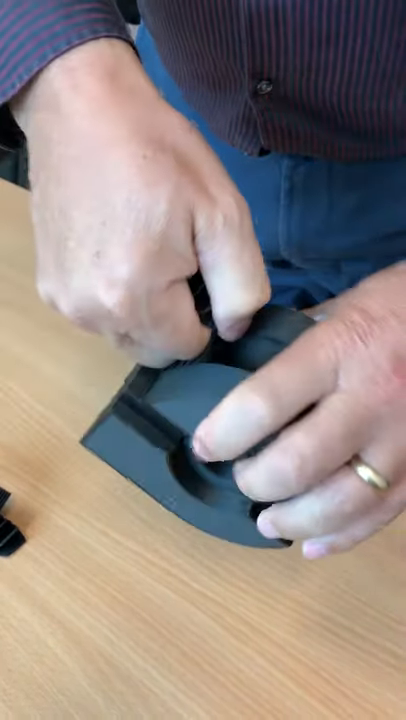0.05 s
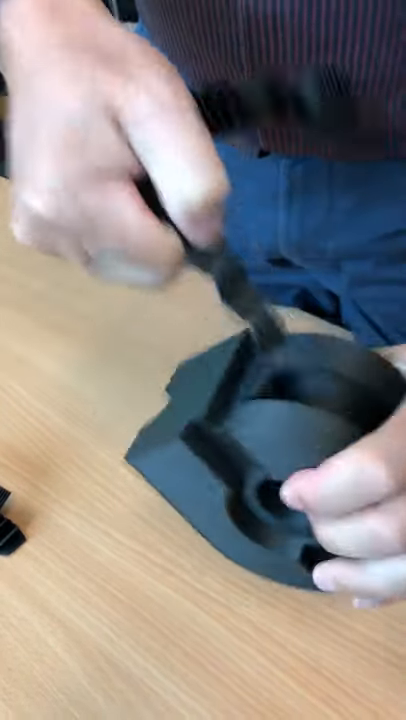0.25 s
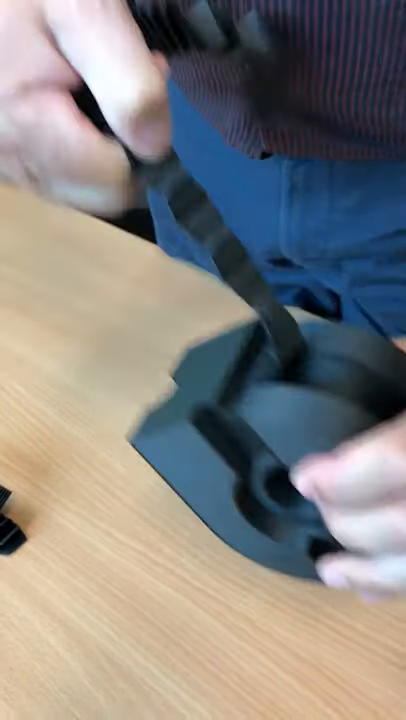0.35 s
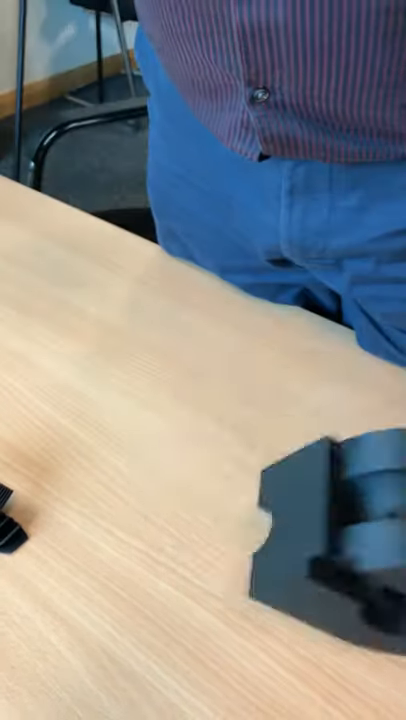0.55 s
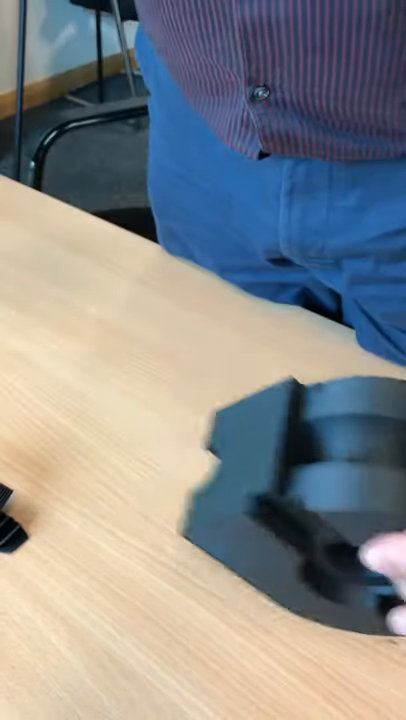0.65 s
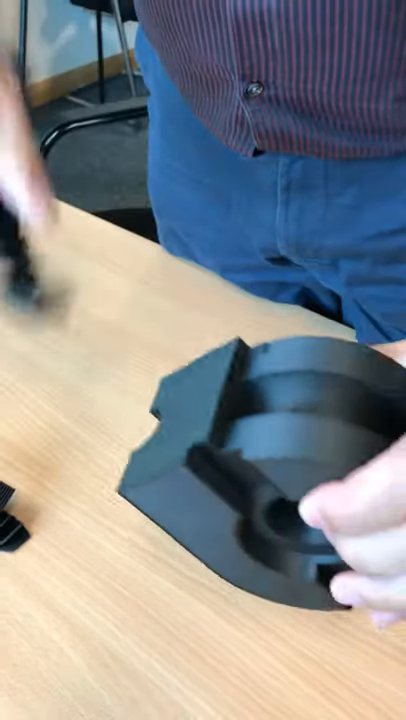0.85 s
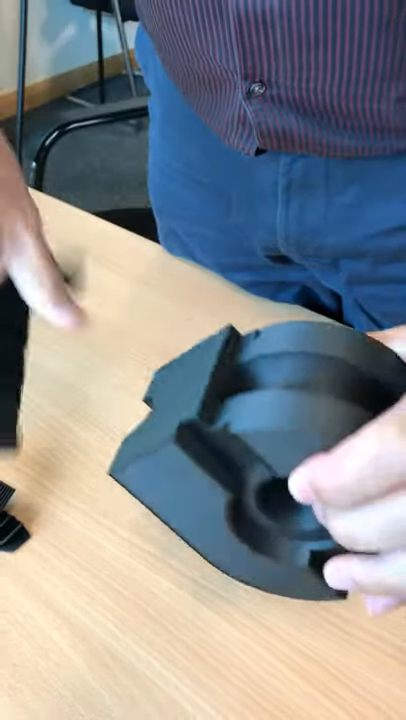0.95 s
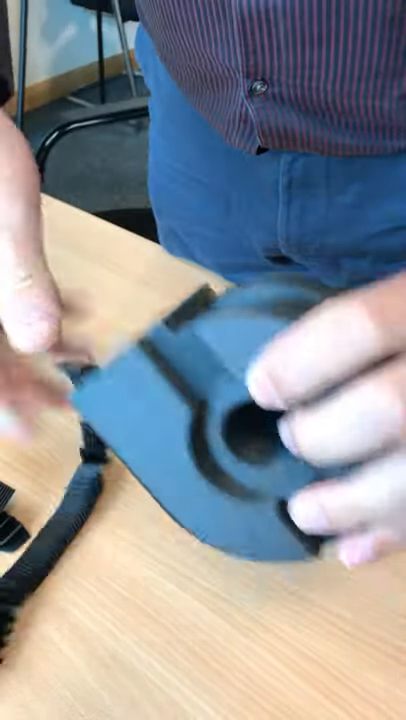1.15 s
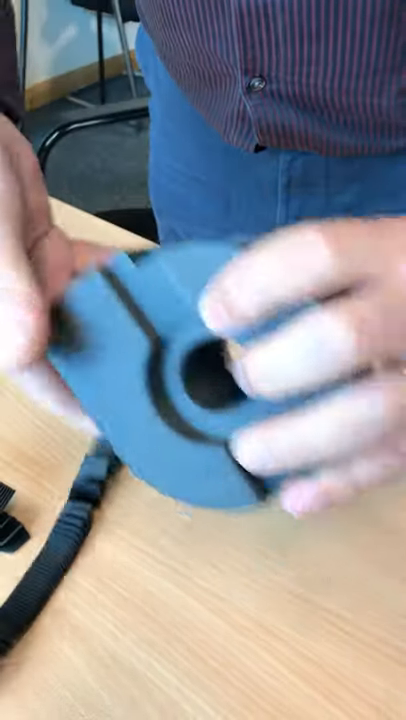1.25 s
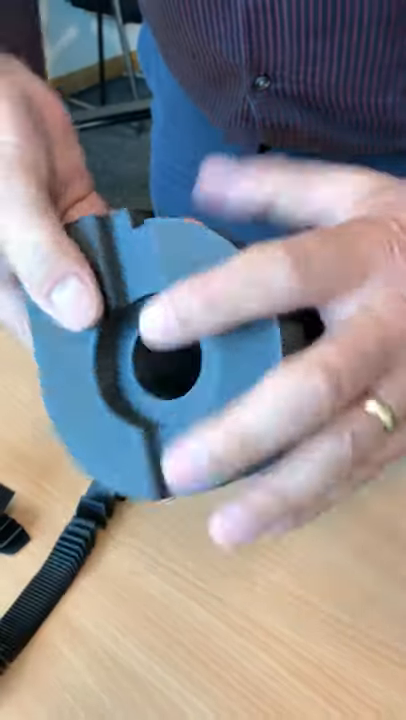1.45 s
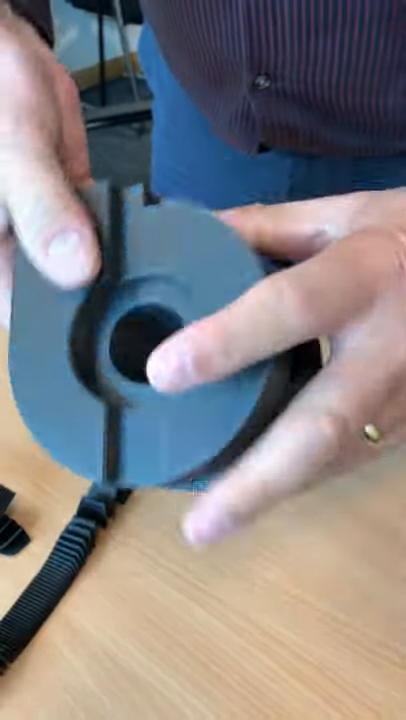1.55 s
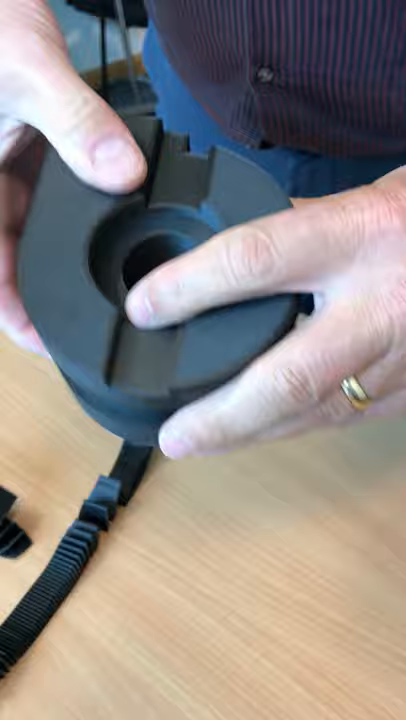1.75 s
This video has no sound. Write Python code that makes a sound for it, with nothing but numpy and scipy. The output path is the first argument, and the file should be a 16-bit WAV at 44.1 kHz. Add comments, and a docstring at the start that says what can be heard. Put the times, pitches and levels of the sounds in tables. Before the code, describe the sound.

A plastic strip rips out of a plastic part, close up, with a fast run of sharp cracks and slight flapping from 0.2 to 0.45 seconds, then a dry snap at about 0.55. A few faint ticks follow. At 1.1 seconds the strip clatters lightly onto a wooden table and slides until 1.4. Fingers then scuff the part softly. Low ventilation rumbles quietly throughout in a small office.

```python
"""A ribbed plastic support strip is ripped out of a printed part, close to one microphone in a small office.
Fingers rub the part over a low ventilation rumble. At 0.2 s the strip's root jerks loose, then its thin
bridges crack one after another while the freed length flaps; the last lets go with a snap at 0.54 s.
At 1.13 s the strip lands on a wooden table, clatters and slides. Last, fingers turn the part over."""
import sys
import numpy as np
from scipy import signal
from scipy.fft import rfft, irfft
from scipy.io import wavfile

SR = 44100
rng = np.random.default_rng(int(sys.argv[2]) if len(sys.argv) > 2 else 0)


def master(y):
    """Save y as 16-bit WAV."""
    cut = np.clip(np.atleast_2d(y).T, -1, 1)
    pcm = np.round(cut * 32767)  # scale
    wavfile.write(sys.argv[1], SR, pcm.astype(np.int16))


N = 79380

# bridges breaking: (time [s], level [dB], ring [Hz], relative treble [dB])
BRIDGE_CRACKS = [(.2441, -22, 9100, 7.5), (.2572, -18, 6500, -3.5), (.259, -15.5, 5400, -7.5),
                 (.2658, -16, 3730, -2.5), (.278, -8.5, 6700, -5), (.2888, -17.5, 3660, -2),
                 (.2982, -26, 4100, 3.5), (.3079, -19.5, 3640, 4), (.3149, -17, 4100, -15),
                 (.3186, -11.5, 2825, -1.5), (.3318, -26, 1410, 7), (.3341, -11, 4140, -6),
                 (.3456, -25, 3630, -12), (.3575, -15, 3240, -5), (.3598, -20, 3050, -3),
                 (.3728, -16.5, 6130, 2), (.3778, -25.5, 4370, 1.5), (.3825, -25.5, 3830, -11.5),
                 (.3932, -16.5, 4040, -11.5), (.3993, -14.5, 4650, -2), (.4012, -20, 1830, -10)]
# spectrum of breaking plastic, close up: (frequency [Hz], level [dB])
CRACK_SPECTRUM = [(200, -31), (800, -14), (1600, -5), (2500, -3), (4000, 3), (4900, -2.5), (6200, 0),
                  (8000, -22), (12000, -55.5)]
# fine crackle along the tear: (time [s], level [dB])
TEAR_LEVELS = [(.21, -55), (.225, -29), (.26, -37.5), (.30, -23.5), (.35, -34.5), (.39, -30), (.425, -33.5),
               (.45, -45), (.49, -49.5), (.535, -48)]
# spectrum of that crackle: (frequency [Hz], level [dB])
TEAR_SPECTRUM = [(150, -30), (300, -5.5), (800, -27), (2000, -4), (3800, -1.5), (5000, -9), (6500, -4),
                 (10000, -10.5), (17000, -22.5)]
# modes of the printed part: (frequency [Hz], level [dB], t60 [s])
PART_MODES = [(2470, 2, 0.076), (2700, -12.5, 0.06), (3323, 2.5, 0.03), (4020, 1, 0.015),
              (4167, -2.5, 0.025), (6220, -1.5, .02), (6730, -2.5, 0.014)]
def tearing(part_db=-13):
    """Close to the microphone, bridges crack in a run with crackle between; the part rings along."""
    cracks = clicks(BRIDGE_CRACKS, CRACK_SPECTRUM, t60=0.0096, ring_t60=0.0084, ring_db=-3,
                    focus_db=9.5, treble_t60=0.01, spike_db=-17, treble_db=-0.5)
    tear = cracks + grains(TEAR_LEVELS, TEAR_SPECTRUM, per_s=1500, spread_db=6, hiss_db=-2.5)
    part_ring = signal.fftconvolve(tear, ring(PART_MODES))[:N]
    return tear + undb(part_db) * np.std(tear) * unit(part_ring)


# the end of the strip tearing free: (time [s], level [dB], ring [Hz], relative treble [dB])
END_SNAPS = [(0.5357, -9, 3570, -3), (0.5424, -11, 3650, -5), (0.5439, -12, 4700, -0.5),
             (0.553, -15, 5300, -2.5)]
# hollow modes of the emptied groove: (frequency [Hz], level [dB re the snap], t60 [s])
GROOVE_MODES = [(675, -27.5, 0.015), (1049, -20, 0.022)]
def snapping():
    """The last of the strip lets go with a dry clack that knocks the emptied groove."""
    out = clicks(END_SNAPS, CRACK_SPECTRUM, t60=0.015, ring_t60=0.003, ring_db=-16.5,
                 focus_db=5.5, treble_t60=0.012, spike_db=-2.5, treble_db=0.5, focus_ratio=1.6)
    for start, db, _, _ in END_SNAPS:
        add(out, start, undb(db) * ring(GROOVE_MODES))
    return out


# the strip's root giving way: (time [s], level [dB])
ROOT_JERKS = [(0.219, -22), (0.2205, -21.5), (.2240, -11.5)]
def prising(hand_t60=0.019, crack_t60=0.008, crack_db=-11, low_cut_hz=1700):
    """The first jerks ring the part, damped by the hand, each with a thin crack and little body."""
    out, t = np.zeros(N), np.arange(N) / SR
    for start, db in ROOT_JERKS:
        crack = colour(rng.standard_normal(N) * fade(t, crack_t60), TEAR_SPECTRUM)
        held_ring = ring(PART_MODES) * fade(t, hand_t60)
        add(out, start, undb(db) * (sized(held_ring) + undb(crack_db) * sized(crack)))
    low_cut = signal.butter(2, low_cut_hz, "highpass", fs=SR, output="sos")
    return signal.sosfilt(low_cut, out)


# twangs of the loose strip, falling in pitch, then rising slightly at the end:
# (time [s], pitch [Hz], level [dB], t60 [s])
STRIP_FLAPS = [(0.2886, 602, -23.5, 0.023), (.308, 372, -35.5, .1), (0.3596, 270, -27.5, .04),
               (0.405, 225, -38.5, 0.073), (0.429, 269, -44, .07)]
def flapping(rise_t60=0.012, rasp_db=-6, rasp_width=0.41):
    """The loose length of strip gives a short rasping twang at each flap."""
    out, t = np.zeros(N), np.arange(SR // 5) / SR
    edge_ratio = 1 + rasp_width / 2
    for start, hz, db, t60 in STRIP_FLAPS:
        band = signal.butter(2, [hz / edge_ratio, hz * edge_ratio], "bandpass", fs=SR, output="sos")
        rasp = undb(rasp_db) * unit(signal.sosfilt(band, rng.standard_normal(len(t))))
        envelope = 2 * (fade(t, t60) - fade(t, rise_t60))
        add(out, start, undb(db) * envelope * (np.sin(2 * np.pi * hz * t) + rasp))
    return out


# ribs striking the table: (time [s], level [dB], ring [Hz], relative treble [dB])
RIB_STRIKES = [(1.1315, -24, 5720, -1), (1.1343, -24, 5800, 0), (1.157, -19, 5430, 2.5),
               (1.177, -22.5, 4300, -20), (1.1803, -24.5, 5500, -22), (1.2008, -15.5, 6500, -11.5),
               (1.218, -29.5, 4240, 2.5), (1.2251, -20, 5160, -8), (1.2532, -36, 2900, -0.5),
               (1.2712, -34.5, 4100, -20), (1.2902, -23.5, 4500, -15)]
# spectrum of lightly struck plastic: (frequency [Hz], level [dB])
STRIKE_SPECTRUM = [(150, -37.5), (500, -18.5), (1100, -14.5), (2200, -4), (3200, -2.5), (5500, 1),
                   (7000, -1.5), (8500, -29.5), (12000, -24.5)]
# the falling strip knocking the table: (time [s], level [dB])
TABLE_THUMPS = [(1.1318, -37.5), (1.156, -43.5), (1.217, -47.5), (1.292, -49)]
# modes of the wooden table: (frequency [Hz], level [dB], t60 [s])
TABLE_MODES = [(43, -10.5, 1), (133.6, 1.5, 0.26), (155.8, -0.5, 0.31), (172.6, 3.5, 0.19),
               (247.6, -2, 0.081), (339.4, -5.5, 0.081), (573, 1, 0.026), (990, 0, 0.11), (1114, -1, 0.1)]
# the strip sliding on the wood: (time [s], level [dB])
SKID_LEVELS = [(1.128, -66), (1.133, -30), (1.15, -36.5), (1.195, -45.5), (1.23, -36), (1.28, -44.5),
               (1.31, -42), (1.365, -42.5), (1.41, -50.5), (1.46, -65)]
# spectrum of that slide: (frequency [Hz], level [dB])
SKID_SPECTRUM = [(200, -5.5), (480, -13.5), (1100, -5), (1700, -0.5), (5000, -3), (9500, -8.5),
                 (17000, -17)]
def landing():
    """The strip thumps the office table, bounces on its ribs and skids to rest."""
    out = clicks(RIB_STRIKES, STRIKE_SPECTRUM, t60=0.016, ring_t60=0.0045, ring_db=0,
                 focus_db=6, treble_t60=0.014, spike_db=-27, treble_db=2)
    for start, db in TABLE_THUMPS:
        add(out, start, undb(db) * ring(TABLE_MODES))
    return out + grains(SKID_LEVELS, SKID_SPECTRUM, per_s=2200, spread_db=3.5, hiss_db=-5)


# ticks of handled plastic: (time [s], level [dB], ring [Hz], relative treble [dB])
PLASTIC_TICKS = [(.0355, -33.5, 3370, -3), (.1845, -41, 6170, -2.5), (.672, -32.5, 3740, 0),
                 (.676, -34.5, 9170, 6.5), (.8425, -44, 5330, -4.5), (.878, -40, 4750, -0.5),
                 (.9795, -42, 4250, -4.5), (.999, -59, 4320, -3), (1.030, -41, 4110, -5.5)]
# fingertips scuffing the ridges as they take a new grip: (time [s], level [dB])
GRIP_SCUFFS = [(1.477, -40), (1.493, -42.5), (1.688, -55)]
# spectrum of a scuff: (frequency [Hz], level [dB])
SCUFF_SPECTRUM = [(400, -16), (1500, -2), (4000, 6), (6000, -1.5), (11000, -21)]
# fingers rubbing on the part: (time [s], level [dB])
RUB_LEVELS = [(0, -63.5), (.14, -62), (.2, -59.5), (.6, -58), (.95, -61.5), (1.08, -66.5), (1.11, -74),
              (1.5, -53.5), (1.54, -61), (1.61, -59), (1.65, -73.5), (1.71, -67), (1.735, -53), (1.78, -78)]
# spectrum of that rubbing: (frequency [Hz], level [dB])
RUB_SPECTRUM = [(300, -3), (1000, -3), (2500, -1.5), (5000, 1.5), (8000, -4.5), (13000, -5), (18000, -8.5)]
def handling(scuff_t60=0.043):
    """Faint even at close range, fingers rub and scuff over the printed ridges and loose bits tick."""
    out = clicks(PLASTIC_TICKS, STRIKE_SPECTRUM, t60=0.019, ring_t60=0.039, ring_db=-6,
                 focus_db=9, treble_t60=0.015, spike_db=-40, treble_db=-0.5)
    t = np.arange(SR // 10) / SR
    for start, db in GRIP_SCUFFS:
        friction = unit(colour(rng.standard_normal(len(t)), SCUFF_SPECTRUM))
        add(out, start, undb(db) * fade(t, scuff_t60) * friction)
    return out + grains(RUB_LEVELS, RUB_SPECTRUM, per_s=2100, spread_db=3.5, hiss_db=-1.5)


# decay of the office: (frequency [Hz], t60 [s])
OFFICE_DECAY = [(200, 0.13), (800, 0.57), (2000, 0.3), (5000, 0.27), (10000, 0.26), (16000, 0.19)]
def office_reflections(x, level_db=-15, delay_s=0.0044, build_s=0.0041, tilt_db_per_octave=0.5):
    """Diffuse reflections reach the microphone just behind the direct sound; the mids last longest."""
    t = np.arange(SR * 3 // 5) / SR
    hz = np.fft.rfftfreq(len(t), 1 / SR)
    noise = rfft(rng.standard_normal(len(t)))
    tail = np.zeros(len(t))
    edges_hz = np.geomspace(30, SR / 2, 13)
    for lo, hi in zip(edges_hz, edges_hz[1:]):
        mid_hz = np.sqrt(lo * hi)
        band = irfft(noise * (hz >= lo) * (hz < hi), len(t))
        lift = undb(tilt_db_per_octave * np.log2(max(mid_hz / 3000, 1)))  # above 3 kHz only
        tail += band * fade(t, at_hz(OFFICE_DECAY, mid_hz)) * lift
    tail *= np.clip((t - delay_s) / build_s, 0, 1)
    return undb(level_db) * signal.fftconvolve(x, tail / np.linalg.norm(tail))[:N]


# room tone at the microphone: (frequency [Hz], level [dB])
RUMBLE_SPECTRUM = [(25, -24), (45, -17), (62, -4), (80, -16), (100, 5.5), (116, -9), (140, 1.5), (175, -1),
                   (215, -13), (300, -11.5), (500, -23), (1000, -27), (3000, -35.5), (16000, -48)]
def ventilation(level_db=-52.5):
    """Behind everything, steady ventilation noise rumbles in the office's low resonances."""
    rumble = colour(rng.standard_normal(2 * N), RUMBLE_SPECTRUM, size=16384)
    return undb(level_db) * unit(rumble[N:])  # once the filter has settled


# bright edge of every plastic click: (frequency [Hz], level [dB])
EDGE_SPECTRUM = [(4000, -27), (6500, 1), (8300, 2), (9600, 2.5), (10600, -2.5), (12000, 3), (15000, 1),
                 (17000, -6), (18500, -5.5)]
def clicks(rows, spectrum, t60, ring_t60, ring_db, focus_db, treble_t60, spike_db, treble_db,
           spike_t60=0.00033, focus_ratio=1.21, rise_t60=0.0025):
    """Each click is a spike and a noise burst, centred on a damped ring of plastic, with a bright edge."""
    out, t = np.zeros(N), np.arange(SR // 25) / SR
    spike = sized(signal.unit_impulse(len(t)))
    for start, db, hz, bright_db in rows:
        body_noise, edge_noise = rng.standard_normal((2, len(t)))
        push = sized(body_noise * fade(t, t60)) + undb(spike_db) * spike
        focus = [(hz / focus_ratio, 0), (hz, focus_db), (hz * focus_ratio, 0)]  # a peak at the ring
        burst = sized(colour(colour(push, spectrum), focus))
        tone = sized(np.sin(2 * np.pi * hz * t) * fade(t, ring_t60) * (1 - fade(t, rise_t60)))
        body = sized(burst + undb(ring_db) * tone)
        edge_envelope = fade(t, treble_t60) + 2 * fade(t, spike_t60)
        edge = sized(colour(edge_noise * edge_envelope, EDGE_SPECTRUM))
        add(out, start, undb(db) * (body + undb(bright_db + treble_db) * edge))
    return out


def grains(levels, spectrum, per_s, spread_db, hiss_db):
    """Dense tiny slips of uneven size over a little hiss, following a level curve."""
    slips = (rng.random(N) < per_s / SR) * rng.choice([-1, 1], N)
    sizes = undb(spread_db * np.minimum(rng.exponential(size=N), 4))
    hiss = undb(hiss_db) * rng.standard_normal(N)
    return contour(levels) * unit(colour(unit(slips * sizes) + hiss, spectrum))


def ring(modes):
    """Impulse response of modes given as (frequency [Hz], level [dB], t60 [s])."""
    t = np.arange(N) / SR
    return sum(undb(db) * fade(t, t60) * np.sin(2 * np.pi * hz * t) for hz, db, t60 in modes)


def colour(x, spectrum, size=1024):
    """Causal filter with the response (frequency [Hz], level [dB])."""
    gains = undb(at_hz(spectrum, np.fft.rfftfreq(size, 1 / SR)))
    cepstrum = irfft(np.log(gains))
    cepstrum[1:size // 2] *= 2  # fold onto positive time for minimum phase
    cepstrum[size // 2 + 1:] = 0
    impulse_response = irfft(np.exp(rfft(cepstrum)))
    return signal.fftconvolve(x, impulse_response)[:len(x)]


def at_hz(points, hz):
    """Read (frequency [Hz], value) points on a log-frequency axis."""
    frequencies, values = np.array(points, float).T
    return np.interp(np.log(np.maximum(hz, 1)), np.log(frequencies), values)


def contour(points):
    """Gain over time from (time [s], level [dB]) points, silent outside them."""
    times, levels = np.array(points, float).T
    return undb(np.interp(np.arange(N) / SR, times, levels, left=-np.inf, right=-np.inf))


def fade(t, t60):
    """Exponential decay, 60 dB down after t60."""
    return np.exp(-np.log(1000) * t / t60)


def undb(db):
    """Decibels to gain."""
    return 10 ** (np.asarray(db) / 20)


def unit(x):
    """Scale to rms 1."""
    return x / np.sqrt(np.mean(x ** 2) + 1e-30)


def sized(x):
    """Scale a click to the energy of 2 ms at rms 1."""
    return np.sqrt(.002 * SR) * x / np.linalg.norm(x)


def add(out, start, x):
    """Mix x into out from the start time on."""
    i = max(int(start * SR), 0)
    out[i:i + len(x)] += x[:N - i]


def scene():
    """One microphone: the plastic close up, the office and its ventilation behind."""
    near = prising() + tearing() + snapping() + flapping() + landing() + handling()
    return (near + office_reflections(near) + ventilation())[None]


def record(dry, bottom_hz=35, top_hz=18200):
    """The recorder drops the deepest bass, clips any peak over full scale and cuts the top."""
    low_cut = signal.butter(6, bottom_hz, "highpass", fs=SR, output="sos")
    high_cut = signal.ellip(8, .2, 90, top_hz, fs=SR, output="sos")
    clipped = np.clip(signal.sosfilt(low_cut, dry), -1, 1)
    return signal.sosfilt(high_cut, clipped)


dry = scene()
out = record(dry)
master(out)
```